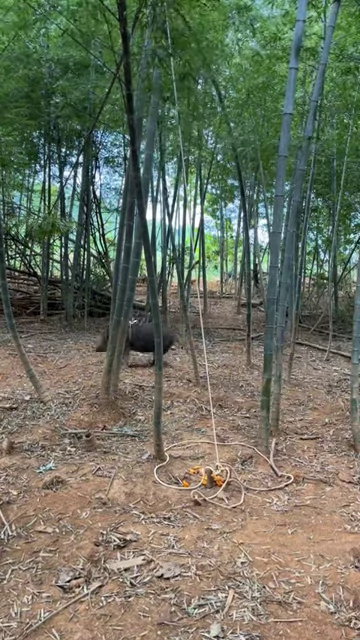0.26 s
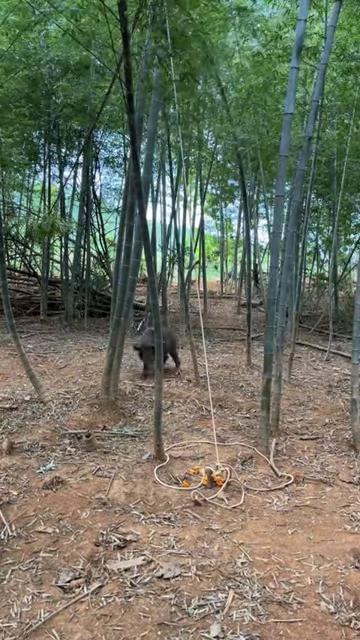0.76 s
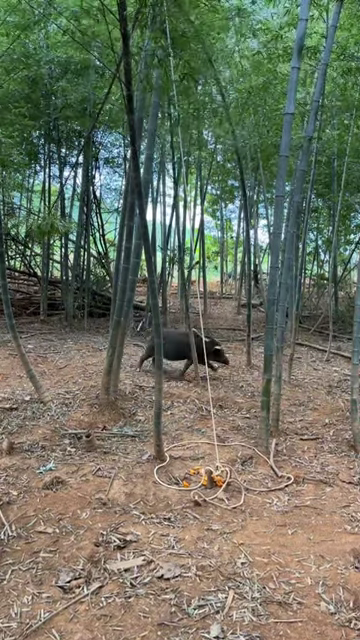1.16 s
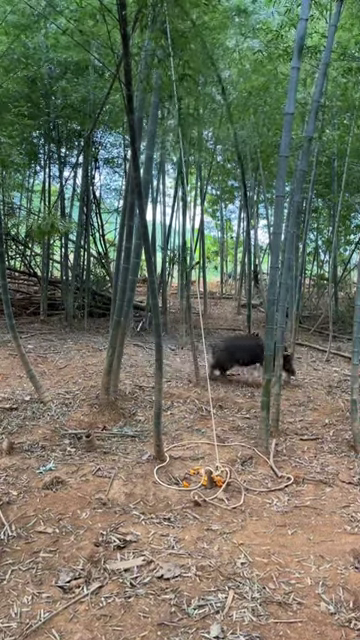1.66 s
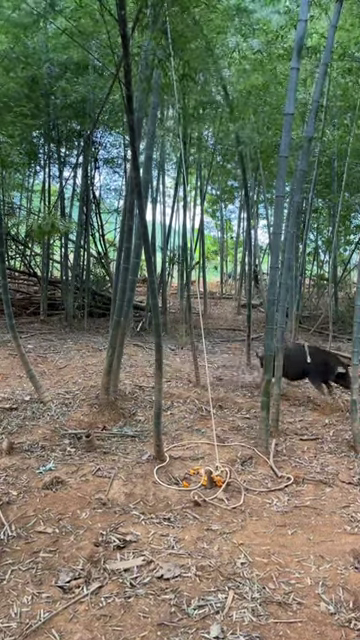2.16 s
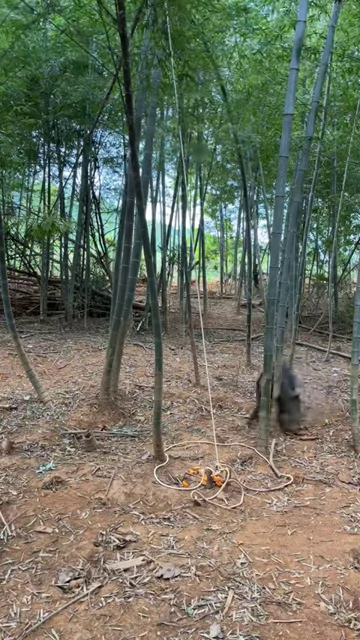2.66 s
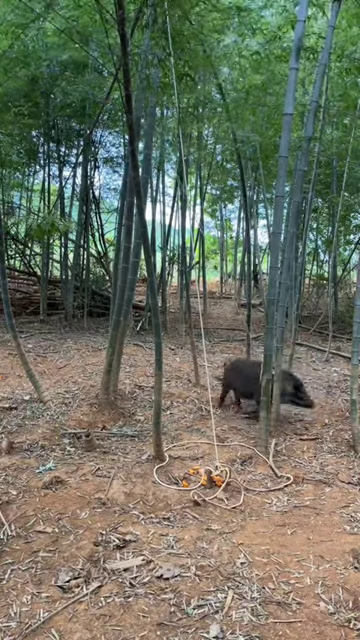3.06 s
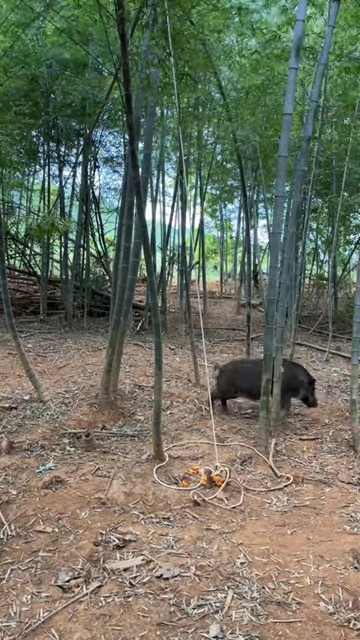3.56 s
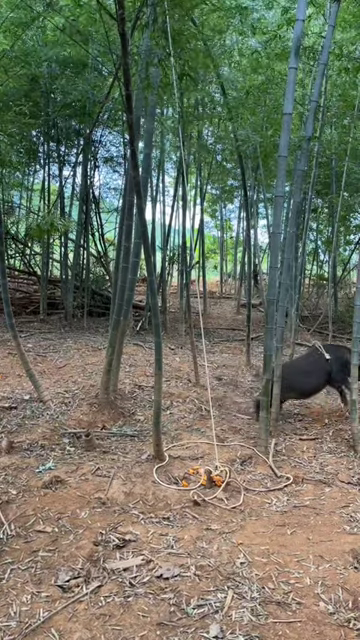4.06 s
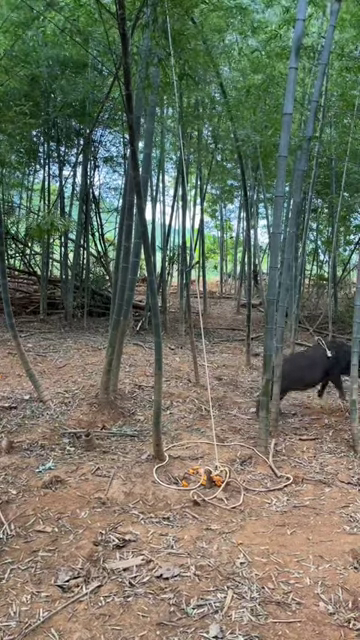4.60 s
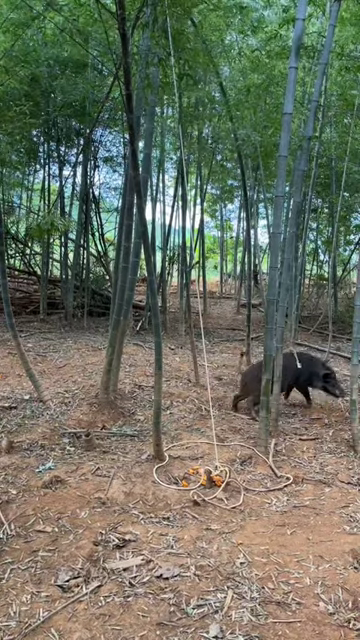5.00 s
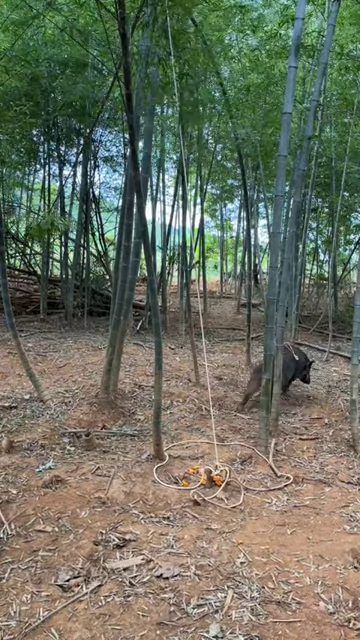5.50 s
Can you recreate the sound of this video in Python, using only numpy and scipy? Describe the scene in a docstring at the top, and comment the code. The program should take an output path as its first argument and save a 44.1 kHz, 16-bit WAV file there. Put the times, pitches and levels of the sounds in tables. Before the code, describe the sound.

Long raw pig screams with short pauses in a leafy grove, with soft hoof thuds, rustling leaves, insect hiss and low wind buffets.

```python
"""A snared wild boar squeals in a bamboo grove, while leaves rustle, far insects hiss and wind buffets a
two-port microphone. First comes the end of one cry, then two snorts, then two long cries that start as a
growl, lock onto a clear rising tone and break up into a harsh scream. Hooves knock the dry ground throughout.
The voice is pulses and noise through moving resonances; knocks are short dying tones, wind and grove are
shaped noise."""
import sys
import numpy as np
from scipy import signal
from scipy.fft import rfft, irfft, next_fast_len
from scipy.io import wavfile
from scipy.ndimage import uniform_filter1d, map_coordinates

SR = 44100
rng = np.random.default_rng(int(sys.argv[2]) if len(sys.argv) > 2 else 0)


def nominal_scale(level):
    """Amplitude ratio for a level in decibels (scalar or array-like)."""
    x = np.asarray(level, float) / 20
    return 10 ** x


def master(y):
    """Save y as 16-bit WAV."""
    cut = np.clip(np.atleast_2d(y).T, -1, 1)
    pcm = np.round(cut * 32767)  # scale
    wavfile.write(sys.argv[1], SR, pcm.astype(np.int16))


N = 253116  # length in samples


def unit(x):
    """Scaled to rms 1."""
    return x / np.sqrt(np.mean(x ** 2) + 1e-20)


def along(points, hz):
    """(f/Hz, value) points read on a log frequency axis."""
    f, v = np.transpose(points)
    return np.interp(np.log(hz + 1), np.log(f + 1), v)


def curves(rows):
    """One value per sample for each column after the time."""
    s, *cols = np.transpose(rows)
    return [np.interp(np.arange(N) / SR, s, c) for c in cols]


def sounding(tables, fade=.008):
    """1 inside the time span of each table, fading outside its ends over fade seconds."""
    t = np.arange(N) / SR
    spans = [np.minimum(t - rows[0][0], rows[-1][0] - t) for rows in tables]
    return np.max([np.clip(span / fade + 1, 0, 1) for span in spans], 0)


def wobble(rate):
    """A smooth random curve around 0 through rate random points a second."""
    knots = rng.standard_normal(int(N * rate / SR) + 4)
    return map_coordinates(knots, [np.arange(N) * rate / SR])


def filtered(x, response):
    """x times a complex response of frequency."""
    m = next_fast_len(N + SR // 2)
    return irfft(rfft(x, m) * response(np.fft.rfftfreq(m, 1 / SR)), m)[..., :N]


def rush(spectrum, alike):
    """Stereo noise of rms 1; sides share more of it where the likeness is near 1."""
    def mid_side_gain(hz):
        turn = np.arccos(np.clip(along(alike, hz), -1, 1)) / 2
        return nominal_scale(along(spectrum, hz)) * [np.cos(turn), np.sin(turn)]
    mid, side = filtered(rng.standard_normal((2, N)), mid_side_gain)
    return unit(np.array([mid + side, mid - side]))


def grove():
    """Leaves rustle and far insects hiss: two bands of steady noise."""
    # rustle and hiss spectra: f/Hz, relative level/dB per Hz
    leaf_spectrum = [(88, -64), (150, -1), (545, -7), (2100, -10.5), (2440, -5.5), (3230, -8.5), (5200, -8),
                     (6760, -65), (11400, -120)]
    insect_spectrum = [(4500, -46), (6000, 10), (11000, 10.5), (14000, 8), (15500, -3)]
    # left-right likeness: f/Hz, likeness (1 = same on both sides)
    alike = [(60, 0.61), (300, 1), (1500, 0.19), (4500, 0.2123), (5500, 0.52)]
    leaves = nominal_scale(-53.5 + 0.14 * wobble(7.4)) * rush(leaf_spectrum, alike)
    insects = nominal_scale(-54.5 + 1.2 * wobble(6.5)) * rush(insect_spectrum, alike)
    return leaves + insects


def wind():
    """Low noise buffets in lumps and gusts, partly different at each port."""
    # gusts: peak t/s, peak level/dB before the last 0.5 dB, half length/s
    gusts = [(0.03, -50, 0.045), (0.075, -34, 0.043), (0.34, -32, 0.069), (0.505, -33.5, 0.046),
             (1.023, -46, 0.34), (1.377, -40, 0.062), (2.08, -46, 0.18), (2.452, -44, 0.1),
             (2.878, -49.5, 0.077)]
    # rumble spectrum: f/Hz, relative level/dB per Hz
    rumble = [(12, -53), (20, -44), (65, -4), (151, -20), (234, -25), (320, -41), (420, -31), (700, -120)]
    t = np.arange(N) / SR
    strength = nominal_scale(-61)  # calm between gusts
    for s, db, half in gusts:
        strength = strength + nominal_scale(db) * np.exp(-((t - s) / half) ** 2)
    each_port = np.array([wobble(14), wobble(16)])
    lumps = nominal_scale(4.5 * wobble(14) + 1.5 * each_port)
    return strength * nominal_scale(0.5) * unit(lumps * rush(rumble, [(30, 0.6)]))


def knocks():
    """Hooves and rope: a short low push of earth with a dry snap of a twig on top."""
    # knocks: t/s, thud gain/dB, click gain/dB over the thud, thud f/Hz
    knock_rows = [(0.489, -32, -10, 122), (1.312, -23, -39, 116.8), (1.513, -46, 20.5, 169.9),
                  (2.884, -41, 3, 183), (3.355, -31.5, -14, 150.3), (3.967, -30, 5, 220),
                  (5.548, -30, -32, 170.1), (5.601, -24, -32, 105.4)]
    out, t = np.zeros(N + SR), np.arange(SR // 10) / SR
    for s, db, click_db, hz in knock_rows:
        thud = np.sin(2 * np.pi * hz * t) * nominal_scale(-60 * t / 0.06) * (1 - np.exp(-t / .004))
        click = 0.32 * rng.standard_normal(len(t))
        for click_hz, gain in [(1870, 1), (2250, 0.82), (2750, 0.39)]:
            click = click + gain * np.sin(2 * np.pi * click_hz * t)
        click = click * nominal_scale(click_db - 60 * t / 0.022)
        out[round(s * SR):][:len(t)] += nominal_scale(db) * (thud + click)
    return out[:N]


def stems(x):
    """Stems scatter sound back: each frequency dies at its own speed; thin stems return little bass,
    leaves swallow the treble."""
    # echo decay: f/Hz, time to fall 60 dB/s
    decay = [(300, .3), (2000, .4), (5000, .3), (8000, .15)]
    hz, t, z = signal.stft(rng.standard_normal((2, SR // 2)), SR, nperseg=256)
    dull = (1 + hz[:, None] / 2500) / (1 + (hz[:, None] / 6300) ** 7)
    dying = nominal_scale(-60 * t / along(decay, hz)[:, None])
    tail = signal.istft(z * dull * dying, SR, nperseg=256)[1]
    tail = tail / np.linalg.norm(tail[0])
    late = np.pad(x, (500, 0))  # delay in samples
    return signal.fftconvolve(late[None], tail, axes=1)[:, :N]


def snorts():
    """Each snort is a short cry: a quick rise in dB, then a straight fall."""
    # snorts: peak t/s, level/dB, pitch f/Hz, rise/s, mouth f/Hz
    snort_rows = [(0.904, -32, 372.6, .044, 1006), (1.039, -32.5, 430.1, 0.02432, 850)]
    fall_s, from_db, to_db = 0.087, -17, -27  # start and end against the peak
    jaw, breath_db = 0.55, -11  # same meaning as in the table of cries
    calls = []
    for s, db, hz, rise, mouth_hz in snort_rows:
        shape = [(-rise, from_db), (0, 0), (fall_s, to_db)]
        calls.append([(s + after, hz, db + under_db, jaw, mouth_hz, breath_db) for after, under_db in shape])
    return calls


def glottis(pitch, rough, alternate):
    """Flat-spectrum pulses at half the pitch; rough folds wander, tear the overtones and leak puffs of air."""
    wander = .035 * wobble(20) + .04 * wobble(90) + .09 * wobble(300)
    phase = np.pi * np.cumsum(pitch * (1 + rough ** 1.5 * wander)) / SR  # of half the pitch
    pulses = 0
    for k in range(1, 31):
        strength = alternate if k % 2 else 1  # odd lines make strong and weak cycles alternate
        pulses = pulses + np.cos(k * phase) * strength * nominal_scale(3 * wobble(14) - 1)
    pulses = pulses * np.sqrt(4 * pitch / SR / (1 + alternate ** 2))  # power per Hz like unit noise
    puffs = unit(rng.standard_normal(N) * (1 + 0.047 * alternate * np.cos(phase)))
    leak = .6 * rough ** 2
    return np.sqrt(1 - leak) * pulses + np.sqrt(leak) * puffs, puffs, phase


def creak():
    """Slack folds slap in single beats: gain jumps at each uneven beat and dies until the next."""
    # creaking spells: start t/s, end t/s
    creak_spells = [(.86, 1.1), (1.38, 1.465), (1.66, 1.69), (3.085, 3.14)]
    beat = np.cumsum(76 * nominal_scale(1.5 * wobble(40)) / SR) % 1  # about 76 beats a second
    active = sounding([[[a], [b]] for a, b in creak_spells])
    return nominal_scale(active * 13 * (.42 - beat))  # falls 13 dB within a beat


def whistle(phase, rough):
    """A second, higher vibration, unsteady and chopped by the folds into lines one pitch above and below."""
    # spells: start t/s, length/s, from f/Hz, to f/Hz, level/dB before -2 dB, line one pitch above/dB over it
    spell_rows = [(0.0, 0.12, 1668, 1704, -22, -5.5), (.105, 0.062, 1600, 1437, -27.5, -6),
                  (.21, 0.04, 1787, 1888, -24.5, -23), (1.881, .17, 1271, 1573, -37.5, -0.5),
                  (2.07, 0.19, 1550, 1727, -31, 2), (2.21, .13, 1804, 1827, -35.5, 5.5),
                  (2.345, .15, 1859, 1880, -38.5, 6.5), (2.5, 0.059, 1900, 1849, -24, -3),
                  (2.57, 0.085, 1903, 1866, -21, -15), (3.42, 0.22, 1609, 1550, -41.5, -29),
                  (3.875, 0.17, 1294, 1321, -24, -13), (4.06, 0.17, 1333, 1412, -31, -2),
                  (4.25, 0.17, 1548, 1650, -31, -0.5), (4.425, 0.15, 1618, 1345, -27, -2.5),
                  (4.58, 0.21, 1339, 1235, -33, 2), (4.85, 0.21, 1684, 1724, -28.5, -8),
                  (5.56, 0.05, 1663, 1743, -22.5, -19)]
    spells = []
    for s, length, from_hz, to_hz, db, above_db in spell_rows:
        spells.append([(s, from_hz, db, above_db), (s + length, to_hz, db, above_db)])
    hz, db, above_db = curves(np.vstack(spells))
    unsteady = 1 + rough * (.036 * wobble(220) + .012 * wobble(30))
    swing = 2 * np.pi * np.cumsum(hz * unsteady) / SR
    # the line itself, one pitch above, one pitch below, and its octave
    lines = [(swing, 0), (swing + 2 * phase, above_db), (swing - 2 * phase, -18), (2 * swing, -15)]
    total = 0
    for turn, line_db in lines:
        total = total + nominal_scale(line_db + 3 * wobble(25) + 5 * rough * wobble(160)) * np.sin(turn)
    return np.sqrt(2) * nominal_scale(db + 2.5 * wobble(40) - 2.0) * total * sounding(spells, fade=0.014)


def patches(shape, depth_db):
    """Random gain in streaks, narrow in pitch and long in time: the voice lights up here and there."""
    field = uniform_filter1d(rng.standard_normal(shape), size=2, axis=0)
    field = uniform_filter1d(field, size=30, axis=1)
    return unit(nominal_scale(depth_db * unit(field)))


def voice_levels(level_db, jaw, breath_db, rough, alternate):
    """Shut jaws hum the pitch, open ones sound the mouth; dB of hum, chest, throat, mouth, rasp and air."""
    db = lambda gain: 20 * np.log10(gain)
    both = np.hypot(jaw, 1 - jaw)
    hum_db = level_db + db((1 - jaw) / both)
    mouth_db = level_db + db(jaw / both)
    growl = alternate ** 4 * (1 - jaw)  # shut jaws hold back alternating cycles
    # the chest follows the hum when cycles alternate; a torn voice shakes it too
    chest_db = db(nominal_scale(hum_db - 6) * alternate ** 5.7 + nominal_scale(level_db + 25.5) * rough ** 57)
    throat = nominal_scale(-9.3) / (1 + (0.65 / rough) ** 7)  # wakes around roughness 0.65
    throat = throat + nominal_scale(-1.8) * jaw ** 9  # jaws wide
    throat = throat + nominal_scale(-43.8) + nominal_scale(-49.3) * rough ** 8  # clear voice, and more when torn
    throat = throat + nominal_scale(-14.3) * growl
    throat_db = level_db + db(throat)
    rasp_db = level_db + breath_db + 4
    air_db = -31 + 2.58 * (rasp_db + 31) - 2 * growl  # air grows faster than rasp; a growl passes less
    return hum_db, chest_db, throat_db, mouth_db, rasp_db, air_db


def nasal_hollow(f, at):
    """The nasal passage swallows a moving band, and the mouth passes little above it: both gains."""
    # swallowed band: t/s, centre f/Hz, half width/Hz, depth 0-1
    hollow_rows = [(0, 3160, 252, 0.6), (.4, 2980, 250, 0.3), (1.4, 2394, 535, 0.7), (1.68, 2190, 565, 1),
                   (1.8, 2922, 303.4, 0), (2.1, 2816, 303.8, 0.45), (2.35, 3238, 354, 0.82),
                   (2.62, 3050, 424, .7), (2.7, 3300, 246.8, 0.06), (3.08, 2500, 493, 0),
                   (3.3, 2474, 600, 1), (3.66, 2554, 444, 0.02), (4.05, 2202, 297, 0.85),
                   (4.2, 2624, 198.1, 0.96), (4.4, 2950, 200, 0.89), (4.8, 2995, 251.1, 0.9),
                   (5.7, 2923, 249.7, 0.42)]
    hollow_hz, half_width, depth = (c[at] for c in curves(hollow_rows))
    under = 1 / np.sqrt(1 + (f / hollow_hz) ** 16)
    hollow = 1 - np.clip(depth, 0, 1) * np.exp(-((f - hollow_hz) / half_width) ** 4)
    return under, hollow


def snout_rasp(f, at, jaw, rough, rasp_db):
    """Upper snout resonances, sinking in a torn voice and wandering; open jaws even them out."""
    # resonances with jaws shut, then open: f/Hz, relative level/dB per Hz
    rasp_shut = [(2700, -35), (3050, -9), (3400, 0), (3800, -10), (4200, -13), (4800, -5), (5500, -7),
                 (6500, -30)]
    rasp_open = [(2200, -74), (2900, -0.5), (3600, -8), (5300, -8.5), (6500, -40)]
    snout = (1 + .12 * (.55 - rough) + .025 * wobble(5))[at]
    wide = np.clip(2 * jaw[at] - .9, 0, 1)
    rasp = (1 - wide) * along(rasp_shut, f / snout) + wide * along(rasp_open, f)
    return unit(nominal_scale(rasp)) * nominal_scale((rasp_db + 2.5 * wobble(14))[at])


def tract(f, at, pitch, jaw, mouth_hz, rough, levels, under):
    """Chest, throat, mouth and snout resonances: complex gain for each frequency and frame."""
    pitch_db, chest_db, throat_db, mouth_db, rasp_db, _ = levels

    def resonance(centre_hz, width, db):
        """A steep moving resonance, width a share of its centre, passing unit noise at the given level."""
        c = centre_hz[at]
        band = 1j * f * c * width
        shape = (band / (c * c - f * f + band)) ** 3
        return shape / np.sqrt(np.mean(abs(shape) ** 2, 0)) * nominal_scale(db[at])

    narrow = (.5 + .5 * np.minimum(2 * jaw, 1))[at]  # shut jaws narrow throat and mouth
    # the throat moves from a share of the mouth frequency to its own, lifted in a torn voice
    throat_hz = .7 * mouth_hz * (1 - jaw) + (605 + 200 * rough ** 5) * jaw
    gain = resonance(pitch / 2, 1.0, chest_db) + resonance(throat_hz, 0.7 * narrow, throat_db)
    mouth = resonance(mouth_hz, 0.59 * narrow, mouth_db - 2.5)  # a hump
    mouth = mouth + resonance(mouth_hz, 0.051, mouth_db - 8.0)  # its sharp core
    mouth = mouth - jaw[at] * resonance(1.54 * mouth_hz, 0.47, mouth_db - 14.5)  # added by open jaws
    gain = gain - mouth * under
    gain = gain + snout_rasp(f, at, jaw, rough, rasp_db)
    # a rough voice smears the pitch into a band
    return gain - rough[at] * resonance(pitch, 1.0, pitch_db + .7)


def breath(puffs, flutter, air_db):
    """Air through the snout: the puffs of the folds as patchy, shaped noise."""
    # breath spectrum: f/Hz, relative level/dB per Hz
    breath_spectrum = [(2800, -7), (3600, 4.5), (5000, -5), (6000, 5), (9000, -5), (12000, -5.5),
                       (15500, -20.5)]
    clumps = signal.stft(puffs * flutter, SR, nperseg=256)[2]
    clumps = clumps * patches(clumps.shape, depth_db=3)
    clumps = signal.istft(clumps, SR, nperseg=256)[1][:N]
    air = unit(filtered(clumps, lambda hz: nominal_scale(along(breath_spectrum, hz))))
    return air * nominal_scale(air_db + 1.27 * wobble(16))


def boar():
    """The folds sound through moving chest, throat and mouth resonances; the pitch itself stands out clear."""
    # one table per cry: t/s, pitch f/Hz, level/dB before the parts' own gains, jaw opening 0-1,
    # mouth f/Hz, breath/dB over level before 4 dB more
    cries = [
        [(0.0, 530.4, -31.5, 0.94, 1640, -6.5), (0.08, 551, -31, 0.81, 1730, -4.5),
         (0.168, 506.8, -29, 0.84, 1547, -8.5), (0.234, 522.7, -26, 0.81, 1740, -10.5),
         (0.352, 505, -23, 0.72, 1710, -13), (0.43, 559.5, -49, 0, 1610, -5)],
        [(1.38, 371.4, -45, 0.36, 1700, -16), (1.407, 366.2, -29.5, 0.35, 1470, -20),
         (1.46, 378.4, -32, 0.36, 1370, -12.5), (1.48, 208.3, -39, 0.6, 1417, -1.5),
         (1.56, 218, -34, 0.5, 1310, -5.5), (1.615, 259.6, -29.5, 0.6, 1280, -8.5),
         (1.675, 419.3, -30, 0.68, 1340, -11), (1.7, 489, -29.5, 0.6, 1449, -7.5),
         (1.794, 525, -31.5, 0.25, 1870, -7.5), (1.942, 545.3, -29.5, 0.28, 1390, -10),
         (2.004, 565, -26.5, 0.37, 1985, -11.5), (2.144, 601.2, -24.5, 0.66, 1622, -13),
         (2.326, 628.8, -18, 0.76, 1906, -21.5), (2.456, 624.5, -13.5, 0.74, 1878, -23.5),
         (2.564, 675.6, -11.5, 0.93, 2059, -23), (2.65, 657, -19.5, 0.59, 2020, -19.5),
         (2.68, 643.4, -23, 0.63, 1880, -10.5), (2.7, 591.3, -21, 0.72, 2316, -14),
         (2.756, 645, -26, 0.71, 1890, -13.5), (2.8, 549, -42.5, 0.82, 1680, -11)],
        [(3.055, 404.8, -67, 0.42, 1698, -11), (3.067, 392, -36, 0.42, 1706, -9.5),
         (3.125, 335, -36, 0.15, 1312, -13.5), (3.25, 344.5, -38, 0.4, 1450, -8),
         (3.33, 413, -33.5, 0.24, 1642, -15.5), (3.42, 427.5, -38, 0.4, 1750, -8),
         (3.49, 376, -35.5, 0.18, 1607, -6.5), (3.62, 452, -32.5, 0.17, 1620, -4),
         (3.67, 462.6, -27.5, 0.27, 1623, -6.5), (3.74, 472.8, -29.5, 0.4, 1805, -8),
         (3.84, 497.2, -27.5, 0.49, 1472, -12), (3.9, 516.7, -24, 0.6, 1514, -14),
         (3.97, 508.5, -24.5, 0.65, 1449, -13), (4.05, 511.6, -27, 0.73, 1310, -10),
         (4.22, 551.6, -29, 0.79, 1497, -12), (4.3, 547.5, -24.5, 0.96, 1986, -17),
         (4.51, 516.7, -27.5, 0.89, 1559, -9.5), (4.57, 507.4, -24.5, 0.95, 1501, -15.5),
         (4.74, 489.8, -25, 0.84, 1758, -13.5), (4.91, 493.4, -25, 0.85, 1686, -15),
         (5.05, 495, -20.5, 0.89, 1821, -17), (5.17, 524.2, -21.5, 0.83, 1709, -14),
         (5.51, 542.6, -23, 0.93, 1805, -11.5), (5.56, 571.3, -19.5, 0.77, 1650, -13.5),
         (5.64, 507.4, -21, 0.85, 1739, -11.5), (5.69, 563.3, -41.5, 0.58, 2003, -3.5)],
    ]
    # swing of the vocal folds: t/s, roughness 0-1, alternation of strong and weak cycles 0-1
    folds = [(0, .85, .6), (.12, .85, .5), (.17, .52, .5), (.27, .52, .5), (.36, .9, .6), (1.1, .95, .6),
             (1.45, .8, .9), (1.48, .65, .3), (1.66, .75, .3), (1.72, .35, .3), (1.9, .35, .6),
             (2.04, .38, .5), (2.09, .6, .5), (2.2, .48, .4), (2.4, .6, .3), (2.8, .9, .5), (3.06, .7, 1),
             (3.2, .58, 1), (3.58, .55, 1), (3.64, .2, .1), (3.7, .22, .15), (3.85, .33, .25),
             (4.2, .42, .3), (4.35, .36, .2), (4.55, .36, .8), (4.7, .38, 1), (4.9, .6, .7), (5.5, .62, .5),
             (5.6, .9, .6)]
    calls = sorted(cries + snorts())
    pitch, level_db, jaw, mouth_hz, breath_db = curves(np.vstack(calls))
    jaw = np.clip(jaw, .02, .995)
    rough, alternate = curves(folds)
    levels = voice_levels(level_db, jaw, breath_db, rough, alternate)
    pitch_db, air_db = levels[0], levels[-1]

    source, puffs, phase = glottis(pitch, rough, alternate)
    growl = rough * np.clip((520 - pitch) / 120, .3, 1)  # slack, low folds throb; tight ones scream evenly
    flutter = nominal_scale(growl * (5.5 * np.tanh(wobble(190)) - 1)) * creak()

    hz, t, z = signal.stft(source * flutter, SR, nperseg=512, noverlap=384)
    whistle_z = signal.stft(whistle(phase, rough), SR, nperseg=512, noverlap=384)[2]
    at, f = np.minimum((t * SR).astype(int), N - 1), hz[:, None]  # sample of each frame, frequency column
    under, hollow = nasal_hollow(f, at)
    gain = tract(f, at, pitch, jaw, mouth_hz, rough, levels, under)
    gain = gain * hollow * patches(z.shape, depth_db=3)
    voiced = z * gain + whistle_z * under * hollow
    body = signal.istft(voiced, SR, nperseg=512, noverlap=384)[1][:N]

    tone_gain = np.sqrt(2) * (1 - rough ** 2) * nominal_scale(pitch_db + 8.0 + 4.9 * growl * wobble(45))
    tone = tone_gain * flutter * np.sin(2 * phase)
    return (body + tone + breath(puffs, flutter, air_db)) * sounding(calls)


def scene():
    """The animal with its echo, over wind and grove."""
    animal = boar() + knocks()
    echo = nominal_scale(-12.5) * stems(animal)
    return animal + echo + wind() + grove()


def band_limit(x):
    """A steep low-pass at the top of the band."""
    return signal.sosfilt(signal.butter(12, 15480, fs=SR, output="sos"), x)


def record(dry):
    """The two ports differ in level and phase, frequency by frequency; the loudest peaks round off."""
    # level between ports: f/Hz, left minus right/dB
    lean = [(60, 2), (200, 0), (700, -2), (1280, -1.5), (4370, -4), (5600, 0)]
    # phase between ports: f/Hz, lead of the left/radians
    lead = [(0, 0), (600, -.9), (1290, -.7), (2330, .4), (3300, 1.5), (5100, 1.9), (5800, 3.1), (6300, 3.3),
            (7670, 6.0), (8870, 6.5), (9650, 9.3), (10900, 9.5), (11800, 12.5), (13400, 12.6),
            (13900, 15.6), (15500, 15.8)]
    side = np.array([[.5], [-.5]])  # half the difference to each port

    def port_response(hz):
        return nominal_scale(side * along(lean, hz)) * np.exp(1j * side * along(lead, hz))

    ports = filtered(dry, port_response)
    ports = ports / (1 + abs(ports / .8) ** 3) ** (1 / 3)  # bends towards a ceiling of 0.8
    return band_limit(ports)


dry = scene()
out = record(dry)
master(out)
```